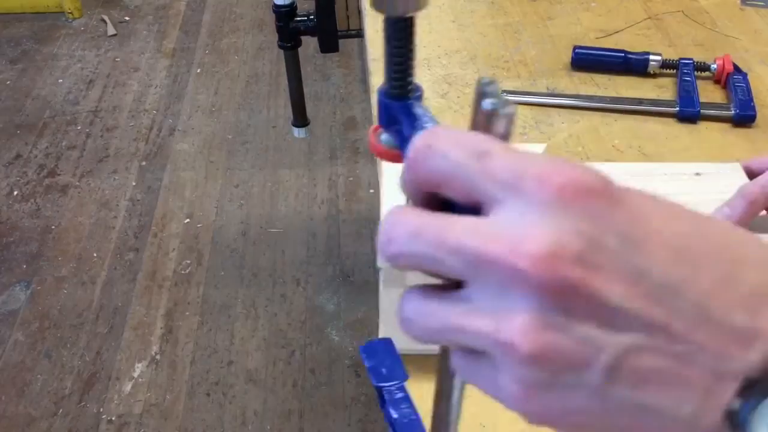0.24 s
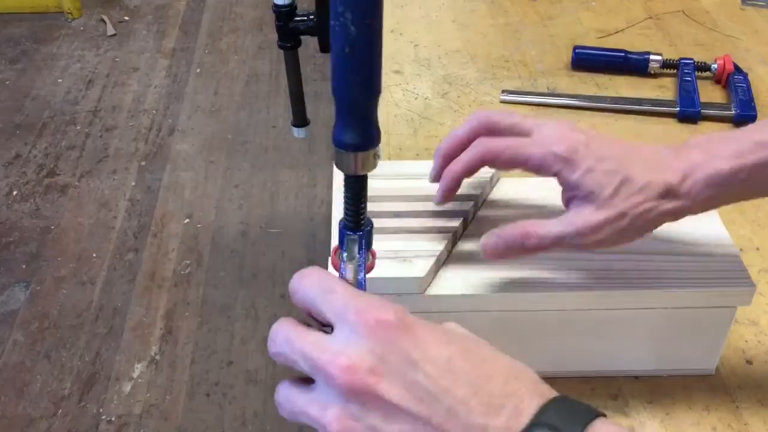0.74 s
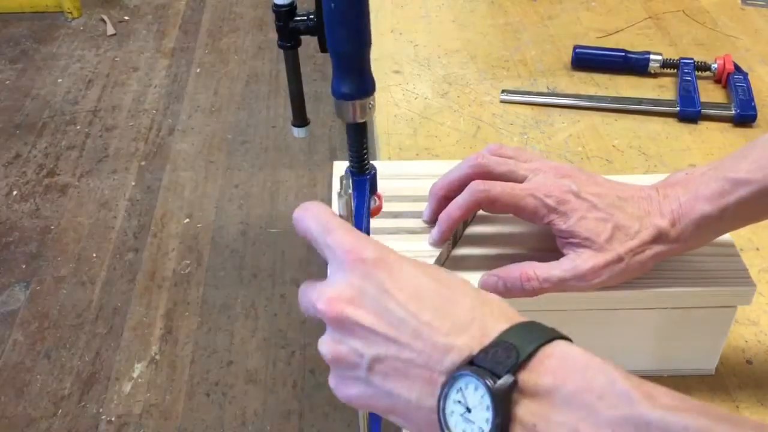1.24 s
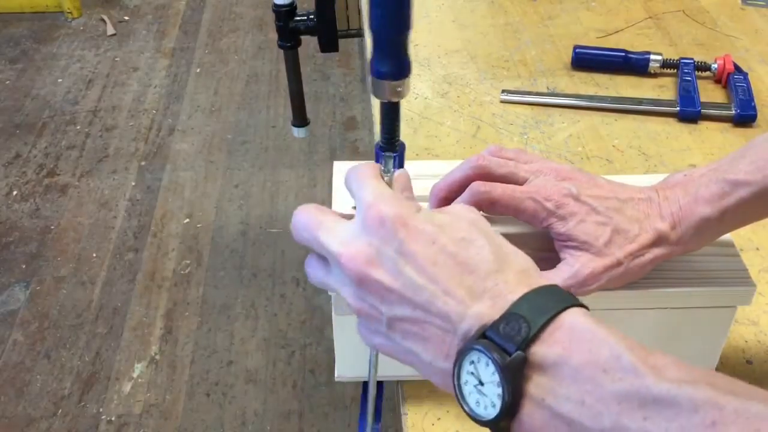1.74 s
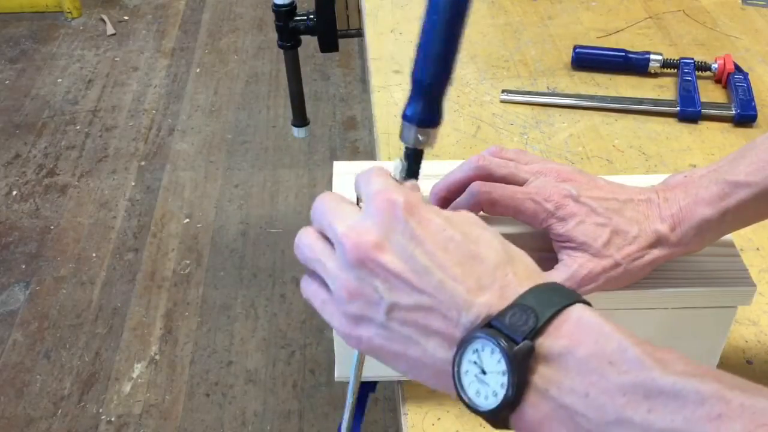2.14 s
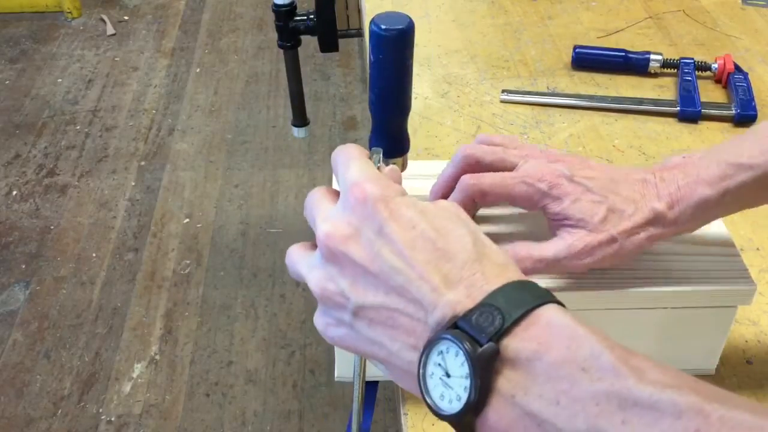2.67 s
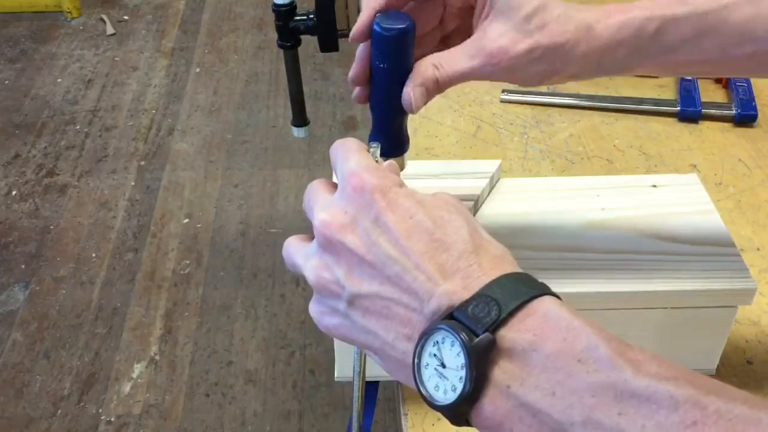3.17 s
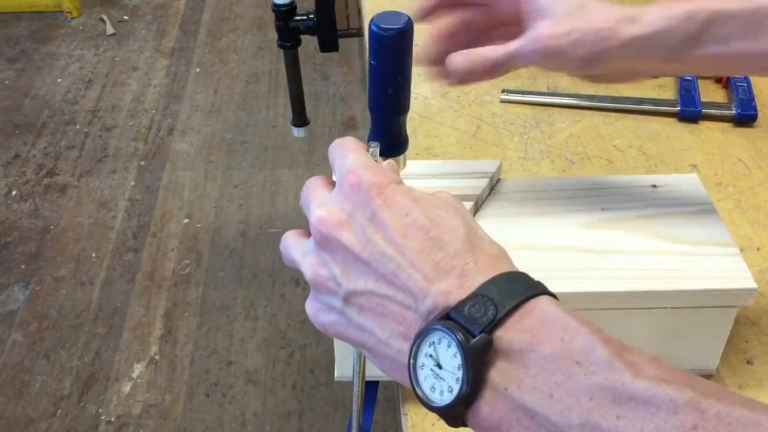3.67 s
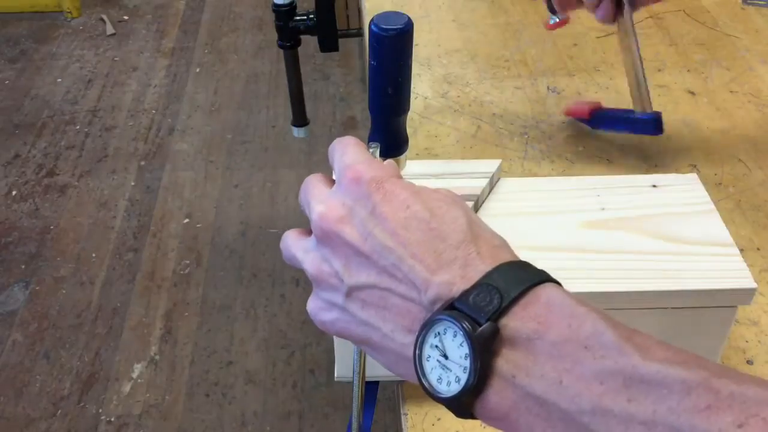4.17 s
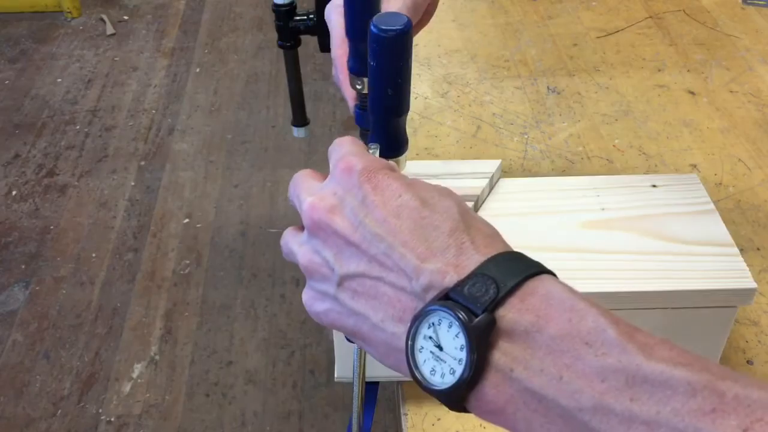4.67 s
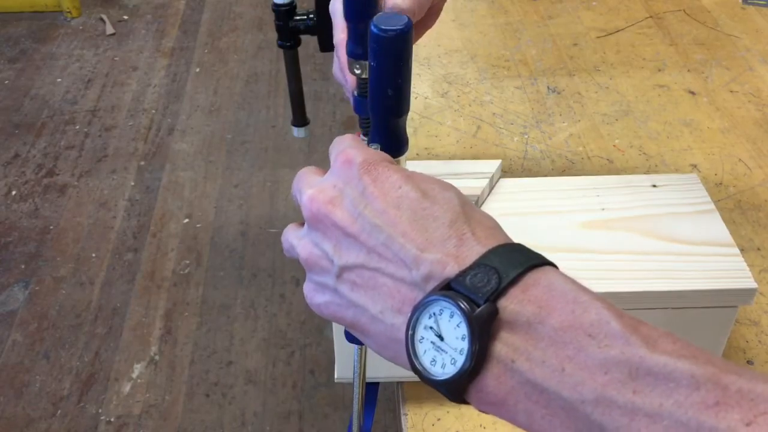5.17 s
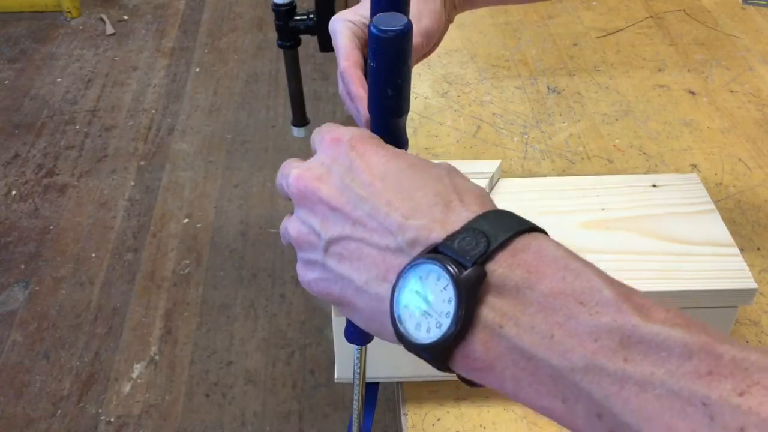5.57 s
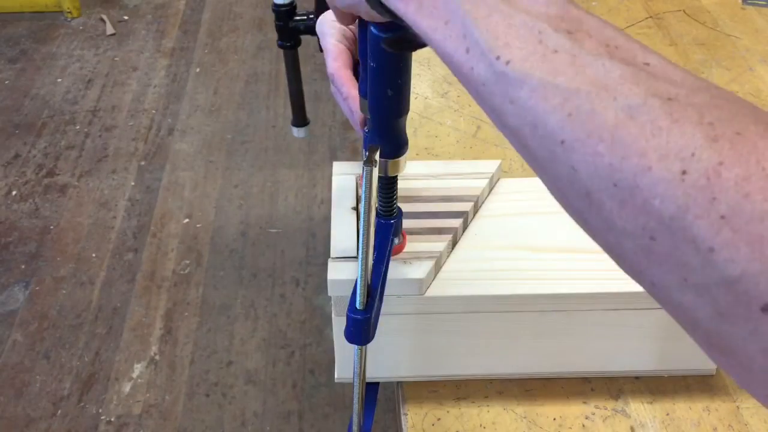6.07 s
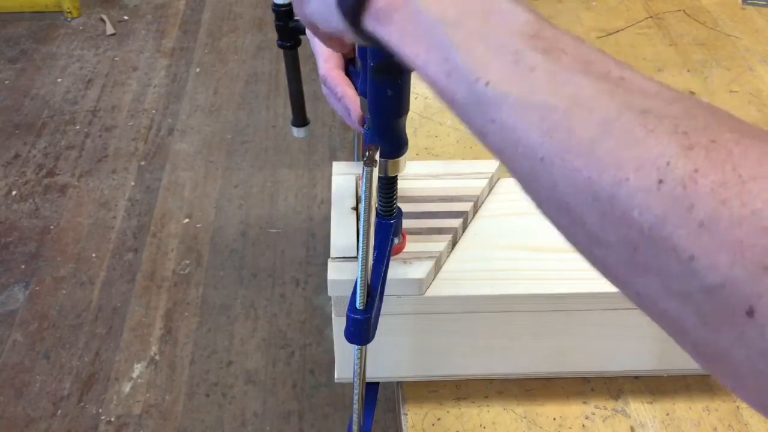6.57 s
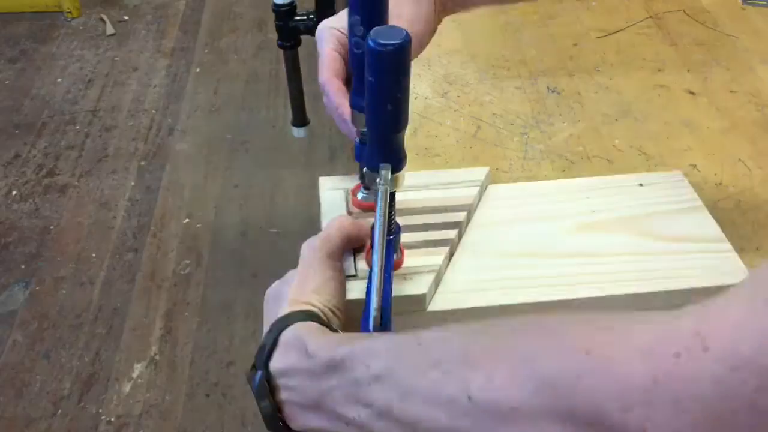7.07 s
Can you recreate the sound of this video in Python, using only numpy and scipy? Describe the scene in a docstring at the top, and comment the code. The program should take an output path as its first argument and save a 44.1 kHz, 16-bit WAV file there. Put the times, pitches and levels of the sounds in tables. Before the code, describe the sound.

Two metal bar clamps are fitted to a wooden box in turn, bright chattering clicks and woody knocks above a steady deep workshop hum.

```python
"""Two steel bar clamps, fitted in turn to a hollow wooden box on a bench: jaws click and chatter, thin ticks between.
Each contact is a burst of chatter force through tabled modes; pads knock wood and bench the same way.
Rubbing is shaped noise with two raised modes per stroke; the workshop answers each contact with a noise tail.
Underneath, ventilation rumbles, hisses and hums as coloured noise, with the microphone's own faint high hiss."""
import sys
import numpy as np
from scipy import signal
from scipy.fft import rfft, irfft, next_fast_len
from scipy.io import wavfile
from scipy.ndimage import uniform_filter1d

SR = 44100
rng = np.random.default_rng(int(sys.argv[2]) if len(sys.argv) > 2 else 0)


def put_to_file(sound):
    """Save the sound as 16-bit audio at rate SR, in the file named by the first command-line argument."""
    columns = np.atleast_2d(sound).T  # one column per channel
    safe = np.clip(columns, -1, 1)
    whole_steps = np.round(safe * 32767)
    wavfile.write(sys.argv[1], SR, whole_steps.astype(np.int16))


def voltage_ratio(level):
    """Linear amplitude factor for a level in decibels (scalar or array-like)."""
    return 10 ** (np.asarray(level, float) / 20)


N = 322371
SPAN = 2 ** 14  # samples of the workshop's answer; a contact rings for half of it


def unit(x):
    """Scales each row to rms 1."""
    return x / np.sqrt(np.mean(x ** 2, axis=-1, keepdims=True) + 1e-20)


def along(points, hz):
    """Interpolates (Hz, value) points on a near-log frequency axis."""
    f, v = np.transpose(points)
    return np.interp(np.log(hz + 0.085), np.log(f + 0.42), v)


def noise(gain):
    """Gaussian noise of rms 1, shaped by a gain of frequency."""
    size = next_fast_len(N + SR)
    spectrum = rfft(rng.standard_normal(size)) * gain(np.fft.rfftfreq(size, 1 / SR))
    return unit(irfft(spectrum, size)[:N])


def coloured(spectrum):
    """Noise of rms 1 with a tabled spectrum."""
    return noise(lambda f: voltage_ratio(along(spectrum, f)))


def microphone_hiss():
    """The microphone's own faint high hiss: noise that flattens out in the treble."""
    return voltage_ratio(-64) * noise(lambda f: f / (f + 6000))


# slow pressure sway: (frequency [Hz], relative density [dB])
SWAY_SPECTRUM = [(1.5, -30), (3, -9.5), (12, 6), (20, 2), (28, -43), (36, -18), (60, -120)]
# duct rumble: (frequency [Hz], relative density [dB])
RUMBLE_SPECTRUM = [(20, -51.5), (30, 3), (38, -12), (46, 3), (54, -7), (65, -7), (78, -20.5), (95, -31),
                   (130, -63.5), (200, -120)]
# room hiss: (frequency [Hz], relative density [dB])
HISS_SPECTRUM = [(56, -43), (95, 0), (118, -6), (163, -16), (256, -16), (347, -15.5), (430, -15.5),
                 (500, -21), (738, -35.5), (822, -30.5), (1020, -32), (1910, -34.5), (2420, -40),
                 (13000, -62), (16500, -68)]
# wavering fan tones: (centre [Hz], width [Hz], level [dB])
FAN_TONES = [(185.4, 31, -51), (272, 50, -62), (437.2, 3.2, -49.5), (714, 82, -60), (1855, 23, -71)]


def ventilation():
    """Sway, rumble and hiss of the air in three layers, plus fan tones as narrow, unsteady noise bands."""
    sway_db, rumble_db, hiss_db = -13.5, -20, -38.5
    air = voltage_ratio(sway_db) * coloured(SWAY_SPECTRUM)
    air += voltage_ratio(rumble_db) * coloured(RUMBLE_SPECTRUM)
    air += voltage_ratio(hiss_db) * coloured(HISS_SPECTRUM)
    for hz, width_hz, db in FAN_TONES:
        air += voltage_ratio(db) * noise(lambda f: 1 / (1 + ((f - hz) / width_hz * 2) ** 2))
    return air


# decay of the workshop: (frequency [Hz], t60 [s])
ROOM_T60 = [(200, 0.48), (600, 0.34), (1500, 0.42), (4000, 0.38), (10000, 0.38), (13000, 0.15),
            (16000, 0.29)]
# colour of its answer: (frequency [Hz], relative level [dB])
ROOM_COLOUR = [(200, 3), (1000, 5), (3000, 0.5), (8000, 4.5), (12000, 3.5), (15000, 4.5)]


def placed(rows, sent, times_s, room_db, gap_s):
    """Sets rows at their times; each sends its own signal into a freshly drawn decaying noise tail."""
    hz, t, z = signal.stft(rng.standard_normal((len(rows), SPAN)), SR, nperseg=256)
    decay_db = 60 * t / along(ROOM_T60, hz)[:, None]
    z = z * voltage_ratio(along(ROOM_COLOUR, hz)[:, None] - decay_db)
    tail = signal.istft(z, SR, nperseg=256)[1][:, :SPAN]
    tail = unit(tail * (np.arange(SPAN) > gap_s * SR)) / np.sqrt(SPAN)  # unit energy
    wet = voltage_ratio(room_db) * signal.fftconvolve(sent, tail, axes=1)
    wet[:, :SPAN // 2] += rows
    out = np.zeros(N + 2 * SPAN)
    for s, row in zip(times_s, wet):
        out[round(s * SR):][:len(row)] += row
    return out[:N]


def contact(ms, spiky, rise_ms, first):
    """Contact force: a first touch, then uneven chatter that swells and falls 30 dB in ms."""
    t_ms = np.arange(SPAN // 8) * 1000 / SR
    chance = rng.standard_normal((len(ms), 2, len(t_ms)))
    shape = (1 - np.exp(-t_ms / rise_ms)) * voltage_ratio(-30 * t_ms / np.clip(ms, .3, 60)[:, None])
    force = chance[:, 0] * np.exp(spiky * chance[:, 1]) * shape
    force[:, 0] = first
    # even push at all pitches: the colour comes from the modes
    z = rfft(force, SPAN // 4)
    smooth_power = uniform_filter1d(np.abs(z) ** 2, size=21, axis=1)
    return irfft(z / np.sqrt(smooth_power), SPAN // 4)[:, :len(t_ms)]


def ring(force, hz, width_hz, gains):
    """Drives each row's resonances, alternating in sign, with its force; peak 1."""
    f = np.fft.rfftfreq(SPAN // 2, 1 / SR)
    response = 0
    for k, (c, w, g) in enumerate(zip(hz.T, width_hz, gains.T)):
        mode = 1j * f * w / (c[:, None] ** 2 - f * f + 1j * f * w)
        response = response + (-1) ** k * g[:, None] * mode
    fade = np.hanning(SPAN)[SPAN // 2:]
    x = irfft(rfft(force, SPAN // 2) * response, SPAN // 2) * fade
    return x / (np.abs(x).max(axis=1, keepdims=True) + 1e-12)


def struck(modes, count, scatter_db, shift):
    """Modes as each blow finds them: grip and place change strength and pitch a little."""
    hz, width_hz, db = np.transpose(modes)
    chance = rng.standard_normal((count, 2, len(hz)))
    return hz * (1 + shift * chance[:, 0]), width_hz, voltage_ratio(db + scatter_db * chance[:, 1])


def near(hz, centre_hz, depth_db, reach):
    """Weakens modes far in log pitch from the blow's own colour."""
    return voltage_ratio(-depth_db * np.tanh(np.abs(np.log(hz / centre_hz[:, None])) / reach))


# dragging: (frequency [Hz], relative density [dB])
SCRAPE_SPECTRUM = [(120, -38), (200, -15), (281, -6.5), (422, -16), (468, -10), (736, -18), (1590, -23),
                   (3000, -32), (3900, -70), (6600, -120)]
# brushing: (frequency [Hz], relative density [dB])
BRUSH_SPECTRUM = [(1760, -44), (3000, -8), (6170, -13.5), (7050, -13.5), (14300, -20), (16000, -42)]
# (start [s], swell [s], hold [s], fade [s], scrape level [dB], hiss level [dB], two woken modes [Hz], [Hz])
RUB_STROKES = [(-0.05, 0.053, 0.17, 0.04, -37.5, -56.5, 302, 1100),
               (0.158, 0.086, 0.17, 0.087, -37, -53.5, 720, 785),
               (5.84, 0.038, .03, 0.065, -60.5, -73, 395, 1594),
               (6.263, 0.045, 0.068, 0.062, -50, -61.5, 710, 1920),
               (7.092, 0.045, 0.012, 0.072, -43.5, -53.5, 696, 955)]


def rubbing():
    """Wood dragged in two pushes, later hands and sleeve: noise strokes, each waking two modes of the box."""
    out = np.zeros(N)
    woken_db, half_width_hz = 3, 55
    for s, swell, hold, fade, scrape_db, hiss_db, low_hz, high_hz in RUB_STROKES:
        corners_s = np.cumsum([0, swell, hold, fade])
        shape = np.interp(np.arange(N) / SR - s, corners_s, [0, 1, 1, 0]) ** 2

        def scrape_gain(f):
            """The scrape's spectrum with its two modes raised."""
            peaks = sum(1 / (1 + ((f - c) / half_width_hz) ** 2) for c in (low_hz, high_hz))
            return voltage_ratio(along(SCRAPE_SPECTRUM, f)) * (1 + voltage_ratio(woken_db) * peaks)

        scrape = voltage_ratio(scrape_db) * noise(scrape_gain)
        out += shape * (scrape + voltage_ratio(hiss_db) * coloured(BRUSH_SPECTRUM))
    return out


def knocked(rows, modes, damping, tap_db, room_db, focus_db):
    """Knocks ring a body's low modes; a harder edge adds its upper modes and a broad tap."""
    s, db, body_hz, edge_db, ms = np.transpose(rows)
    hz, width_hz, gain = struck(modes, len(s), scatter_db=2, shift=.02)
    width_hz = np.maximum(width_hz, hz.mean(axis=0) * damping)
    force = contact(ms, spiky=0.22, rise_ms=0.3, first=4.0)
    soft = signal.lfilter(*signal.butter(2, 1900, fs=SR), force)  # a pad gives: little treble
    hard = signal.lfilter(*signal.butter(2, 4500, fs=SR), force)
    rolloff = 1 + (hz / (3.2 * body_hz[:, None])) ** 2
    low_gain = gain * near(hz, body_hz, focus_db, 1.0) * (hz < 1600) / rolloff
    body = ring(soft, hz, width_hz, low_gain)
    edge = ring(hard, hz, width_hz, gain * (hz > 1600))
    # many small board modes merge into a dry tap
    tap = ring(hard, np.full((len(s), 1), 2200.), [5000], np.ones((len(s), 1)))
    blow = voltage_ratio(db)[:, None] * (body + voltage_ratio(edge_db)[:, None] * (edge + voltage_ratio(tap_db) * tap))
    return placed(blow, blow, s + .0006, room_db=room_db, gap_s=0.0022)


# blows on the wood: (time [s], blow level [dB], body colour [Hz], edge level [dB], contact [ms])
WOOD_BLOWS = [(1.104, -16.5, 487, -0.5, 3.5), (1.41, -15, 336, -8.5, 5.4), (1.813, -36, 1200, 4.5, 50),
              (2.104, -32, 140, 3.5, 3.5), (2.344, -3, 795, -8.5, 0.88), (2.362, -5.5, 396, -2, 6.6),
              (2.376, -17.5, 250, -16.5, 10), (2.3605, -17, 703, -16.5, 4.5), (2.48, -36, 400, 5, 7.1),
              (2.927, -26.5, 127, -16, 2.4), (3.142, -27, 154, -28, 7.6), (4.664, -28, 220, 7, 1.7),
              (4.682, -28, 135, 7, 30), (4.894, -15, 128, -1, 1.2), (4.902, -11.5, 206, -2.5, 7),
              (4.918, -18, 162, 0, 11), (5.036, -30, 1500, 2.5, 40), (5.052, -18, 830, -31, 6.1),
              (5.062, -27.5, 330, 2.5, 8.8), (5.196, -31, 317, -1.5, 15), (5.216, -16, 390, -10.5, 6.1),
              (5.219, -38, 850, -7, 8.1), (5.223, -19.5, 135, -34, 4.9), (5.884, -30, 396, -3.5, 5.4),
              (6.076, -35.5, 133, 0, 6.5), (6.978, -28, 133, -18, 5), (7.112, -39, 128.4, -5, 4.5)]
# box modes: (centre [Hz], width before damping floor [Hz], level [dB])
BOX_MODES = [(140, 140, -1), (208, 37, -1), (250, 52, 0.5), (348, 137, 1.5), (457, 110, 3),
             (589.4, 300, 0.5), (660, 90, 4), (860, 140, -6), (1260, 150, -14), (1425, 240, -17),
             (1750, 300, -15), (2100, 250, -7), (2300, 200, -1), (2532, 290, 0.5), (3026, 450, -7.5),
             (3600, 500, -7), (4900, 580, -39)]
# jaw slides and stops on the first bar: columns as WOOD_BLOWS
JAW_SLIDES = [(1.629, -23, 1500, 4.7, 12), (1.66, -44, 1500, 4.4, 24), (1.721, -29, 1200, 2, 60)]
# low modes of the first bar: columns as BOX_MODES
BAR_MODES = [(740, 220, -3), (1500, 170, 1), (2330, 130, 0), (3250, 190, -0.5), (4140, 150, -7)]
# second clamp knocks the bench as it is lifted: columns as WOOD_BLOWS
BENCH_BLOWS = [(3.955, -12.5, 790, -11, 5.8), (4.041, -18.5, 340, -18, 14.7), (4.05, -21, 850, -11, 40),
               (4.197, 0.5, 530, -0.5, 5.6), (4.208, -11, 700, -16.5, 12), (4.222, -11, 870, -16, 8)]
# bench modes: columns as BOX_MODES
BENCH_MODES = [(305, 187, 1.5), (340, 113, 6.5), (440, 105, -6), (544, 52, -3.5), (653.5, 55, -1),
               (764, 87, 1), (871, 50, 2), (1057, 77, -4.5), (1175, 80, -3.5), (1290, 80, -2.5),
               (1550, 90, -6.5), (2136, 130, 3.5), (2536, 370, 1), (3277, 200, -4), (4600, 150, -7),
               (5240, 250, -4.5)]
# slow-dying modes under every knock: (centre [Hz], width [Hz], level [dB])
HOLLOW_MODES = [(280, 14, -3), (337, 11, 0.5), (870, 14, -10)]


def box():
    """Strongly damped box, clearer bench top and bar; a few narrow hollow modes linger under all."""
    x = knocked(WOOD_BLOWS, BOX_MODES, damping=0.2, tap_db=2.5, room_db=-6, focus_db=13)
    x = x + knocked(JAW_SLIDES, BAR_MODES, damping=0.08, tap_db=-8.5, room_db=0.5, focus_db=6)
    x = x + knocked(BENCH_BLOWS, BENCH_MODES, damping=0.055, tap_db=-17.0, room_db=-3.0, focus_db=5)
    hollow = sum(voltage_ratio(db) * signal.lfilter(*signal.iirpeak(hz, hz / width_hz, SR), x)
                 for hz, width_hz, db in HOLLOW_MODES)
    return x + hollow


# thin ticks, each round one pitch: (time [s], level [dB], centre [Hz], half width of a stage [Hz], chatter [ms])
THIN_TICKS = [(2.3456, -20.5, 7060, 352.6, 8), (2.9307, -7.5, 14500, 936, 1.6),
              (6.2082, -22, 4800, 1100, 8.2), (6.112, -46, 2460, 600, 3.5), (6.168, -41, 2480, 800, 3),
              (6.39, -43, 3500, 800, 4)]


def thin_ticks():
    """Single-pitched ticks: chatter through three equal resonances in series."""
    s, db, hz, half_width_hz, ms = np.transpose(THIN_TICKS)
    x = contact(ms, spiky=0.317, rise_ms=0.32, first=2.3)
    for stage in range(3):
        x = ring(x, hz[:, None], [2 * half_width_hz[:, None]], np.ones((len(s), 1)))
    x = voltage_ratio(db)[:, None] * x
    return placed(x, x, s - .0004, room_db=-10.0, gap_s=0.0025)


def clamp(rows, modes, frame_hz):
    """Steel on steel: a broad crack, bright modes of jaw and bar, and the lower ring of the frame."""
    s, db, bright_hz, frame_db, ms = np.transpose(rows)
    hz, width_hz, gain = struck(modes, len(s), scatter_db=3, shift=.008)
    mean_hz = hz.mean(axis=0)
    width_hz = np.clip(width_hz, mean_hz / 50, mean_hz / 14)  # the hand damps the steel
    force = contact(ms, spiky=0.82, rise_ms=0.93, first=3.68)
    high = ring(force, hz, width_hz, gain * near(hz, bright_hz, 27, 0.063) * (hz > 5800))
    frame_near = near(hz, np.full(len(s), frame_hz), 15.7, 0.43)
    low = ring(force, hz, width_hz, gain * frame_near * (hz < 5800))
    one = np.ones((len(s), 1))
    crack = ring(force, bright_hz[:, None], [5500], one)
    crack = ring(crack, bright_hz[:, None], [8000], one)
    thud = ring(force, frame_hz * one, [3500], one)
    thud = ring(thud, frame_hz * one, [5000], one)
    # harder blows crack more
    broad = voltage_ratio(3.5 + .1 * db)[:, None] * crack + voltage_ratio(frame_db - 7.0)[:, None] * thud
    rung = high + voltage_ratio(frame_db)[:, None] * low
    level = voltage_ratio(db)[:, None]
    # the ring reaches the walls more weakly than the crack
    sent = level * (voltage_ratio(-3.5) * rung + broad)
    return placed(level * (rung + broad), sent, s - .0004, room_db=-7.0, gap_s=0.0025)


# steel contacts: (time [s], level [dB], brightest pitch [Hz], frame ring level [dB], chatter [ms])
STEEL_CONTACTS = [(0.3324, -43.5, 6200, 13.5, 1.2), (0.9412, -46, 9900, -23, 7.2),
                  (0.9592, -35, 13600, -20, 3.1), (0.971, -40, 12300, -9, 1.5),
                  (1.1044, -38, 10500, -10, 3), (1.1682, -43, 10700, -20, 2.2), (1.2161, -40, 11000, -6, 1),
                  (1.3214, -41, 11300, -9, 1.5), (1.4102, -37, 11000, -13.5, 3),
                  (1.445, -41, 11000, -14, 5.6), (1.4775, -47, 11300, -12, 2), (1.598, -36, 11000, -13, 5),
                  (1.6145, -28, 11500, -23, 3.5), (1.6405, -19, 10400, -11, 4),
                  (1.648, -28.5, 11000, -10, 4.9), (1.7475, -22, 11000, -20, 3.8),
                  (1.757, -25, 10400, -20, 4), (1.7715, -12, 10300, -34, 2.3), (1.806, -41, 9000, -14, 3.3),
                  (1.819, -49, 7000, -3, 2), (2.3685, -3, 13500, -15.5, 5.9), (2.377, -20, 12700, -8.5, 6),
                  (4.71, -21, 11100, -16, 3.2), (5.037, -31, 12500, -19, 2.4),
                  (1.2924, -40.5, 10500, -6, 2.9), (1.3542, -32.5, 11300, -11, 1.9),
                  (1.4336, -43.5, 9600, -5, 27), (1.6086, -10.5, 10650, -16, 8.4),
                  (1.6315, -17, 13000, -13, 15), (1.6926, -45, 10500, 12, 9.3),
                  (1.7238, -6, 10400, -50, 1.8), (1.7299, -5.5, 10200, -45, 2.2),
                  (1.7415, -8.5, 10300, -20, 5.7), (1.7655, -15, 10500, -22, 4.9),
                  (1.8282, -12.5, 10500, -36, 1.7), (1.9105, -25.5, 10500, -19, 4.4),
                  (1.9912, -19.5, 10500, -22, 20), (2.0056, -16, 10500, -13, 10.2),
                  (2.0824, -24.5, 10500, -13.5, 5.1), (2.1046, -34, 6600, -12, 20),
                  (2.141, -30, 10500, -11, 8.7), (2.2353, -33.5, 9900, -11, 31),
                  (2.2535, -15, 11250, -10, 14), (2.2657, -10.5, 10200, -14, 16),
                  (2.2728, -4.5, 10320, -17, 5), (2.3286, -19, 10000, -13.5, 32),
                  (2.357, 1, 14900, -18.5, 4.2), (2.3612, 3, 9940, -13.5, 2.8),
                  (2.8037, -23, 12500, -7, 0.43), (3.4403, -37.5, 10550, -26, 3.2),
                  (3.934, -15.5, 11360, -32.5, 3.8), (3.955, -18, 10100, -32.5, 3.4),
                  (3.965, -31, 7600, -22.5, 5.8), (3.9912, -29, 9900, -12, 37),
                  (4.0412, -12, 13000, -41.5, 4.3), (4.056, -23.5, 11100, -15, 59),
                  (4.0834, 1, 9866, -28.5, 5.9), (4.0904, -3, 12600, -23.5, 28),
                  (4.1625, -7.5, 12600, -22, 39), (4.1999, 1, 12860, -23, 8.9),
                  (4.2077, 3.5, 12880, -27, 19), (4.2445, -18.5, 7900, -5, 8.1),
                  (4.3113, -11.5, 8200, -15, 4.5), (4.3214, -15.5, 10500, -8, 5.2),
                  (4.4095, -15.5, 11700, -10.5, 1.1), (4.4278, -11, 11300, -21, 3.8),
                  (4.4431, -16, 11300, -15, 9.3), (4.465, -14, 11250, -15, 8),
                  (4.6674, -6, 11460, -13.5, 6.3), (4.6907, -11.5, 11700, -5.5, 4.5),
                  (4.7418, -17.5, 11300, -16, 5), (4.782, -25, 11200, -13, 13),
                  (4.8349, -12.5, 11450, -12.5, 18), (4.8463, -12.5, 11400, -17, 8.6),
                  (4.8963, -13.5, 11600, -10, 1.2), (4.902, -15.5, 6630, 0.5, 1.7),
                  (4.9135, -15.5, 11300, -8, 5.9), (4.9648, -11.5, 11400, -33, 3.4),
                  (4.9821, -16.5, 12200, -12.5, 4.9), (5.02, -8.5, 11720, -16, 32),
                  (5.0604, -14, 11100, -19, 5.4), (5.2024, -29, 9250, -10, 6.6),
                  (5.213, -12.5, 14300, -15, 23), (5.226, -6, 11500, -14, 5.8),
                  (5.4126, -18, 11700, -14.5, 1.4), (5.47, -20, 11470, -12, 8.2),
                  (5.4818, -17, 11360, -15.5, 6.4), (5.4952, -20.5, 11500, -8, 2.6),
                  (6.2074, -17.5, 10500, -19, 2.3), (6.7387, -41, 6620, -7, 5.5)]
# modes of each clamp: (centre [Hz], width before damping limits [Hz], level [dB])
FIRST_CLAMP_MODES = [(2540, 200, -3.5), (3602, 180, -4.5), (4170, 180, -11), (5030, 540, -7),
                     (7360, 320, -6.5), (9020, 400, -6), (9630, 340, -10), (10335, 200, -1),
                     (11250, 300, -8), (11000, 780, -13.5), (14900, 790, -2.5), (13930, 1500, -2),
                     (16400, 250, -1.5)]
SECOND_CLAMP_MODES = [(2720, 200, 0.5), (3124, 205, -2.5), (3750, 220, 4), (4480, 450, -14),
                      (5090, 460, -3.5), (6710, 730, -16), (7800, 230, -6.5), (9610, 810, -13.5),
                      (10550, 150, -5), (11390, 330, -7.5), (11700, 230, -12.5), (12600, 1200, -11.5),
                      (12250, 600, -22), (14300, 360, -2), (14740, 570, -11)]


def clamps():
    """First clamp, then the second; faint ticks at random times as fingers shift on the steel."""
    swap_s, tick_count = 3.8, 16
    ticks = []
    for when, size, tone in rng.random((tick_count, 3)):
        tick_s = 0.022 + 0.99 * when * N / SR
        tick_db = -48 - 3 * np.log(1 / (1 - 0.9 * size))
        ticks.append((tick_s, tick_db, 10500 * (0.62 + 0.5 * tone), -20, 6.3))
    rows = [*STEEL_CONTACTS, *ticks]
    first = clamp([r for r in rows if r[0] < swap_s], FIRST_CLAMP_MODES, frame_hz=3500)
    second = clamp([r for r in rows if r[0] >= swap_s], SECOND_CLAMP_MODES, frame_hz=3570)
    return first + second


# overall level, with a brief early dip: (time [s], level [dB])
OVERALL_LEVEL = [(0, -7.5), (.17, -7.5), (.2, -17.5), (.205, -32), (.23, -7)]


def scene():
    """All sources summed at one microphone, under the overall level curve."""
    time_s, level_db = np.transpose(OVERALL_LEVEL)
    mix = microphone_hiss() + ventilation() + rubbing() + box() + thin_ticks() + clamps()
    return (mix * voltage_ratio(np.interp(np.arange(N) / SR, time_s, level_db)))[None]


def band_limit(x):
    """A steep low-pass at the top of the band."""
    return signal.sosfilt(signal.butter(12, 16680, fs=SR, output="sos"), x)


def record(dry):
    """Microphone chain: a steep elliptic low-pass at 16 kHz."""
    limited = signal.sosfilt(signal.ellip(10, .5, 70, 16000, fs=SR, output="sos"), dry)
    return band_limit(limited)


dry = scene()
out = record(dry)
put_to_file(out)
```